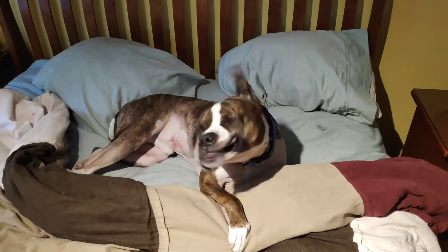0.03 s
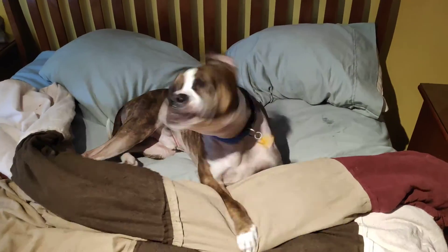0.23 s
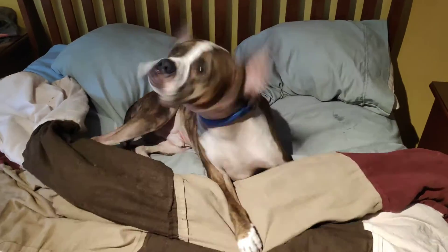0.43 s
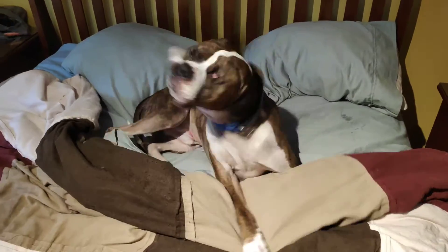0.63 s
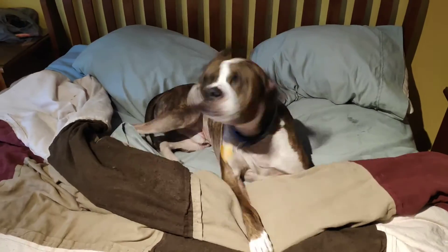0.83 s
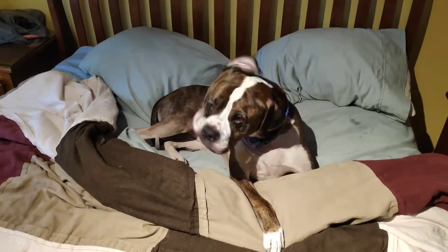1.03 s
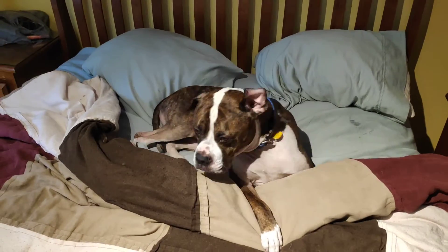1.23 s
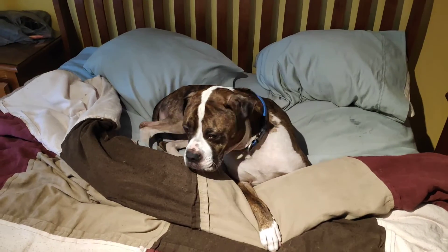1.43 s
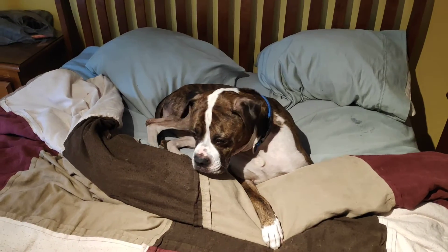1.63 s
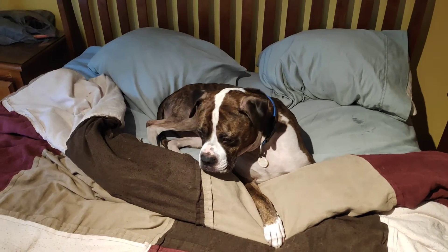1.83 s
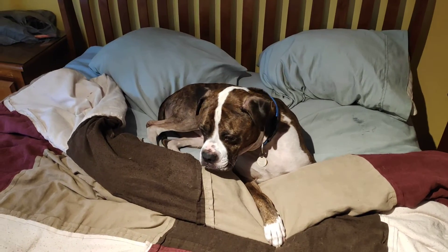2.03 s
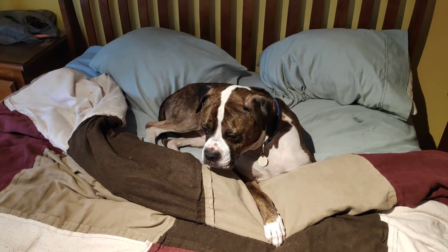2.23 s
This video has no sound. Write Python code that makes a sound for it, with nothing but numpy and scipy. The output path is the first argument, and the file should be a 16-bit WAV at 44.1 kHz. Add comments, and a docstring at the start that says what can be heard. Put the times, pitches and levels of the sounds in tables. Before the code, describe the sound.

A dog shakes its head on a bed in a small room, ears slapping rapidly while its metal tag clashes against the collar buckle. Then it lies down with a soft mattress creak and a faint bedding rustle.

```python
"""A dog shakes its head about six times a second, on a bed in a small, fairly live bedroom.
Its ears slap on every half turn; the steel tag clashes against the collar buckle on every full turn
and jingles on. The mattress rumbles under it. Then it lies down: the mattress creaks, the tag slides
and the bedding shifts. A faint regular ticking sits in the room noise."""
import sys
import numpy as np
from scipy import signal
from scipy.fft import rfft, irfft, next_fast_len
from scipy.io import wavfile
from scipy.ndimage import map_coordinates

SR = 44100
rng = np.random.default_rng(int(sys.argv[2]) if len(sys.argv) > 2 else 0)


def inscribe(sig):
    """Save sig as 16-bit PCM at rate SR to the path in sys.argv[1].

    A 1-D sig is mono; a 2-D sig holds one channel per row.
    Samples are clipped to [-1, 1] before scaling.
    """
    pcm = np.round(np.clip(np.atleast_2d(sig).T, -1, 1) * 32767)
    wavfile.write(sys.argv[1], SR, pcm.astype(np.int16))


N = 101429
HIT_SAMPLES = SR // 2

# room noise, tick spectra (frequency [Hz], level [dB])
HUSH_SPECTRUM = [(12, -31), (20, -5), (33, 0), (70, -3), (103, -12), (174, -9.5), (398, -27.5),
                 (470, -35.5), (889, -21), (1830, -36), (2480, -33), (13800, -37), (15000, -54.5)]
TICK_SPECTRUM = [(200, -16), (650, -9), (1000, -0.5), (1350, -6.5), (1900, -19), (5000, -35)]
# room noise balance (frequency [Hz], left-right [dB])
HUSH_BALANCE = [(30, -5), (100, -11.5), (300, -3), (1000, -13.5), (2500, 3), (8000, -3.5), (14500, 6.5)]
# tick runs (start [s], end [s])
TICK_SPANS = [(1.386, 1.57), (1.684, 1.87), (1.985, 2.17), (2.276, 2.3)]
# reverb decay (frequency [Hz], T60 [s])
TAIL_DECAY = [(150, 0.18), (800, 0.21), (2500, 0.27), (5500, 0.29), (9000, 0.22), (14000, 0.22)]
# reverb colour (frequency [Hz], gain [dB])
TAIL_EQ = [(100, 9), (400, -4.5), (1000, 1), (2500, 6.5), (5500, 3), (9000, -1.5), (14000, -6.5)]
# reverb balance (frequency [Hz], left-right [dB])
TAIL_BALANCE = [(100, -11), (450, -5.5), (750, -12), (1200, 8), (2500, 3), (5000, -2), (9000, 2)]
# early reflections (delay [s], gain [dB])
WALL_ECHOES = [(.0047, -7.5), (0.0113, -18.5)]
# body movement (time [s], mattress [dB], bedding [dB])
BODY_MOTION = [(0, -74, -61.5), (.22, -60, -58.5), (.36, -54.5, -53.5), (.6, -51.5, -47), (.85, -49, -50.5),
               (1.02, -51, -50.5), (1.2, -59.5, -64), (1.42, -65.5, -72), (1.54, -60, -67.5),
               (1.62, -68, -68.5), (1.721, -73.5, -75), (2.3, -69, -75.5)]
# mattress bumps (time [s], level [dB], time constant [s])
MATTRESS_BUMPS = [(0.021, -56, 0.017), (0.402, -49.5, .02), (0.476, -49, 0.02), (0.582, -49.5, 0.046),
                  (0.641, -40, 0.014), (0.761, -46, 0.023), (0.818, -34.5, 0.0076), (1.002, -46, 0.026),
                  (1.137, -52, 0.02), (1.459, -53, 0.019), (1.766, -53, 0.0082), (1.868, -55, 0.0199),
                  (1.953, -60.5, 0.0091), (2.068, -51.5, 0.0066), (2.272, -47, 0.0073)]
# mattress and bedding spectra (frequency [Hz], level [dB])
RUMBLE_SPECTRUM = [(15, 4), (35, 8), (60, -8), (95, -5), (130, -6.5), (190, -11), (290, -22.5),
                   (600, -24.5), (2000, -51.5)]
BUMP_SPECTRUM = [(30, -14), (90, -5), (180, -1.5), (300, -10), (600, -21.5), (2000, -50)]
RUSTLE_SPECTRUM = [(100, 5), (400, 3.5), (850, -3.5), (1500, -7.5), (4000, -7.5), (9000, -10),
                   (15000, -12.5)]
BRUSH_SPECTRUM = [(150, -11), (300, 0.5), (420, 5), (850, -4), (1400, -17), (4000, -29), (12000, -40)]
# split ring on collar loop (time [s], level [dB])
RING_TAPS = [(0.1336, -35.5), (0.1513, -36), (.158, -35), (0.203, -37)]
# steel tag modes (frequency [Hz], bandwidth [Hz], level [dB])
TAG_MODES = [(3570, 670, -4), (6620, 260, 3.5), (9070, 150, 1.5), (9790, 350, -3), (10730, 130, 11.5),
             (12760, 170, 2.5), (13500, 300, -6)]
# tag ringing free (time [s], level [dB])
TAG_PINGS = [(.189, -32.5), (.198, -28), (1.425, -55), (1.462, -50)]
# tag sliding on its ring (time [s], relative level [dB], rise [s], fall [s])
TAG_SLIDES = [(0.158, -31.5, 0.0022, 0.035), (.2, -37, 0.0077, 0.083), (1.466, -45, .03, 0.04),
              (1.673, -60, 0.013, 0.033)]
# tag on buckle, levels relative (time [s], level [dB], left-right [dB], 30 dB decay [s],
# lead-in [s], clack [dB], room [dB], jingle [dB])
TAG_CLASHES = [(0.0869, -37.5, 21, 0.0018, 0.00069, 2, -2.5, -9),
               (0.112, -41.5, 7, 0.004, 0.00064, -1, 0, 6.5),
               (.152, -31, 11.5, 0.0055, .002, -11, -9, -1.5),
               (0.2928, -21.5, 22.5, 0.0052, 0.0004, -25.5, -4, 7.5),
               (0.2953, -27.5, 24, 0.0032, 0.00035, -28, -9, 0),
               (.364, -7.5, 2, 0.0036, 0.0024, -3, 1.5, -2),
               (.5052, -12, 11.5, 0.0041, 0.00044, -2.5, -5, -12),
               (0.5074, -6, 2.5, 0.009, .0005, -4, -4.5, -8.5),
               (0.5118, -12.5, 5.5, 0.006, 0.0011, 5.5, -2.5, -1),
               (.682, -15, 2.5, 0.0061, 0.0046, -5.5, 2.5, 5.5),
               (0.6868, -4, 2, 0.0021, 0.00035, -11, 2, -7),
               (0.8643, -7, 2, 0.0051, 0.0063, -13, -2.5, -5.5),
               (0.8694, -13.5, 4, 0.0028, .001, 8, 2.5, -4.5),
               (.918, -19.5, 13.5, 0.016, 0.0098, -7, -4.5, -4.5),
               (1.006, -25.5, 13.5, 0.032, 0.0026, 6, -9.5, -7),
               (1.0367, -12, 8, 0.017, 0.0086, -0.5, 0, -21),
               (1.3336, -34, 14.5, 0.0069, 0.0037, 8, -7.5, -2.5),
               (1.3414, -28, 6.5, 0.0037, 0.00063, 3, -7, 0.5)]
# tag spectra (frequency [Hz], level [dB])
JINGLE_SPECTRUM = [(2000, -33), (5000, -19.5), (6800, 1.5), (8000, -7), (9500, -3.5), (11000, -2.5),
                   (13000, 0.5), (14500, -5.5)]
CLASH_SPECTRUM = [(800, -61), (2500, -28.5), (5000, -1.5), (7500, -3), (10000, 1.5), (12500, 0),
                  (15000, -2.5)]
CLACK_SPECTRUM = [(700, -53), (1800, -18), (2800, -9), (4200, 1), (6000, -3.5), (8000, -8.5),
                  (14000, -37.5)]
# ear slaps, and a quick wall echo of the slap at 0.568 s; levels relative
# (time [s], level [dB], left-right [dB], crack [dB], room [dB], pop [Hz])
SLAPS_AND_ECHO = [(0.2374, -24, 4.5, -3, -0.5, 739), (0.3126, -40, 2.5, 6, 10.5, 696),
                  (0.3979, -36, 5, 8, 7, 860), (0.4809, -39.5, -3.5, 9, 5, 760),
                  (.485, -36.5, 9.5, 10.5, 2, 730), (0.568, -24, 2.5, 2, 2, 1050),
                  (0.5724, -35, 7, 6.5, -4.5, 1010), (0.6521, -29, 3.5, 2.5, -0.5, 880),
                  (0.742, -26, 0.5, 4.5, 2.5, 930), (0.8262, -36, 5, 8, 2.5, 790),
                  (0.918, -25, -2, 0.5, -2.5, 814), (1.0027, -28, 3, 5, 0.5, 824),
                  (1.117, -46, 1, -2, 2, 784)]
# ear spectra (frequency [Hz], level [dB])
POP_SPECTRUM = [(80, -23.5), (280, -14.5), (480, -5.5), (700, -3.5), (900, 1.5), (1150, -3), (1500, -13.5),
                (2500, -14), (6000, -26.5)]
CRACK_SPECTRUM = [(500, -13.5), (1500, -8.5), (2500, -2.5), (3900, 1.5), (6000, -6), (10000, -7.5),
                  (15000, -7.5)]
# right-channel treble shading (frequency [Hz], gain [dB])
CLASH_RIGHT_EQ = [(2000, 7.5), (4000, -2), (7000, -2.5), (10000, -3.5), (14000, -19.5)]
EAR_RIGHT_EQ = [(700, -1.5), (2500, 0.5), (7000, -6.5), (14000, -22.5)]


def amp(db):
    return 10 ** (np.asarray(db) / 20)


def unit_rms(x):
    return x / np.sqrt(np.mean(x ** 2) + 1e-20)


def decay(t, t60_s):
    return amp(-60 * t / t60_s)


def along(points, hz):
    """Interpolate on a log frequency axis."""
    knots_hz, values = np.transpose(points)
    return np.interp(np.log(hz + 1), np.log(knots_hz + 1), values)


def pan(db):
    """Stereo gains for a left-right difference."""
    gains = np.array([amp(db / 2), amp(-db / 2)]).reshape(2, -1)
    return gains / np.sqrt(np.mean(gains ** 2, axis=0))


def filtered(x, response):
    """Apply the gain response(hz)."""
    n = x.shape[-1]
    size = next_fast_len(n + SR // 4)
    return irfft(rfft(x, size) * response(np.fft.rfftfreq(size, 1 / SR)), size)[..., :n]


def coloured(x, spectrum):
    """Minimum-phase filter of unit energy."""
    size = 2048
    cepstrum = irfft(np.log(amp(along(spectrum, np.fft.rfftfreq(size, 1 / SR)))))
    cepstrum[1:size // 2] *= 2
    cepstrum[size // 2 + 1:] = 0
    kernel = irfft(np.exp(rfft(cepstrum)))
    return signal.fftconvolve(x, kernel[None] / np.linalg.norm(kernel), axes=1)[:, :x.shape[1]]


def wobble(rate_hz, n=N):
    """Smooth random curve."""
    knots = rng.standard_normal(int(n * rate_hz / SR) + 4)
    return map_coordinates(knots, [np.arange(n) * rate_hz / SR])


def add(out, at_s, x):
    start = max(0, round(at_s * SR))
    out[:, start:start + x.shape[1]] += x[:, :out.shape[1] - start]


def click(spectrum):
    return coloured(signal.unit_impulse(HIT_SAMPLES)[None], spectrum)


def stereo_noise(spectrum, spread):
    return unit_rms(coloured(rng.standard_normal(N) + spread * rng.standard_normal((2, N)), spectrum))


def burst(envelope, spectrum, coherence):
    """Stereo noise burst with the energy of its envelope."""
    common = np.sqrt(coherence) * rng.standard_normal(HIT_SAMPLES)
    separate = np.sqrt(1 - coherence) * rng.standard_normal((2, HIT_SAMPLES))
    x = coloured((common + separate) * envelope, spectrum)
    return x * np.linalg.norm(envelope) / np.linalg.norm(x, axis=1, keepdims=True)


def bedroom(x, wet_db):
    """Direct hit, two wall reflections and a diffuse tail."""
    build_s = 0.007
    hz, t, bands = signal.stft(rng.standard_normal((2, HIT_SAMPLES)), SR, nperseg=256)
    bands = bands * decay(t, along(TAIL_DECAY, hz)[:, None])
    tail = signal.istft(bands, SR, nperseg=256)[1][:, :HIT_SAMPLES]
    tail *= 1 - np.exp(-np.arange(HIT_SAMPLES) / SR / build_s)
    tail /= np.linalg.norm(tail[0])
    tail = filtered(tail, lambda f: amp(along(TAIL_EQ, f) + np.outer([.5, -.5], along(TAIL_BALANCE, f))))
    for delay_s, db in WALL_ECHOES:
        lags = (SR * delay_s * rng.uniform(0.92, 1.08, 2)).astype(int)
        tail[[0, 1], lags] += amp(db)
    return x + amp(wet_db) * signal.fftconvolve(x, tail, axes=1)[:, :HIT_SAMPLES]


def background():
    """Quiet room noise and short runs of faint, even ticks."""
    tick_gap_s = 0.03
    hush = stereo_noise(HUSH_SPECTRUM, spread=0.95)
    out = amp(-64) * filtered(hush, lambda hz: pan(along(HUSH_BALANCE, hz)))
    tick = amp(-42.5) * pan(-36) * click(TICK_SPECTRUM)
    for start_s, end_s in TICK_SPANS:
        for at_s in np.arange(start_s, end_s, tick_gap_s):
            add(out, at_s, tick)
    return out


def bed():
    """Movement shakes the mattress, pushes air and rustles bedding; one brush as the dog settles."""
    swing_hz, brush_s, brush_width_s = 10, 1.555, 0.08
    t = np.arange(N) / SR
    times_s, *levels_db = np.transpose(BODY_MOTION)
    mattress, bedding = [amp(np.interp(t, times_s, db)) for db in levels_db]
    rumble = mattress * amp(3 * wobble(25)) * stereo_noise(RUMBLE_SPECTRUM, spread=1) * pan(-8.5)
    air = mattress * amp(9) * np.sin(2 * np.pi * swing_hz * t + 0.5 * wobble(6.5))
    rustle = bedding * amp(1.54 * wobble(70)) * stereo_noise(RUSTLE_SPECTRUM, spread=1)
    swell = np.exp(-((t - brush_s) / brush_width_s) ** 2 / 2)
    brush = amp(-67 + 2.5 * wobble(39)) * swell * stereo_noise(BRUSH_SPECTRUM, spread=0.71)
    return rumble + air + rustle + brush


def mattress_bumps():
    """Dull thuds as weight shifts."""
    out, t = np.zeros((2, N)), np.arange(HIT_SAMPLES) / SR
    for at_s, db, tau_s in MATTRESS_BUMPS:
        add(out, at_s, amp(db) * pan(-18) * burst(np.exp(-t / tau_s), BUMP_SPECTRUM, coherence=0.82))
    return out


def mattress_creak():
    """The mattress gives way in soft, uneven slips as the dog lies down."""
    start_s, end_s, gap_s, scatter_s = 1.24, 1.395, 0.013, 0.003
    centre_hz, attack_s = 175, 0.003
    out, t = np.zeros((2, N)), np.arange(HIT_SAMPLES) / SR
    envelope = decay(t, t60_s=0.04) * (1 - np.exp(-t / attack_s))
    for at_s in np.arange(start_s, end_s, gap_s):
        timing, pitch, size = rng.standard_normal(3)
        slip = np.sin(2 * np.pi * centre_hz * np.exp(0.2 * pitch) * t) * envelope
        add(out, at_s + scatter_s * timing, amp(-46 + 1.8 * size) * pan(-21) * slip)
    return out


def ring_taps():
    """The split ring taps the collar loop: one short note each."""
    out, t = np.zeros((2, N)), np.arange(HIT_SAMPLES) / SR
    for at_s, db in RING_TAPS:
        hz = 3710 * (1 + 0.016 * rng.standard_normal())
        note = np.sin(2 * np.pi * hz * t) * decay(t, t60_s=0.0099)
        add(out, at_s, bedroom(amp(db) * pan(16) * note, wet_db=-13))
    return out


def tag_pings():
    """Light touches ring the tag; its narrowest modes last longest."""
    out, t = np.zeros((2, N)), np.arange(HIT_SAMPLES) / SR
    hz, width_hz, mode_db = np.transpose(TAG_MODES)[:, :, None]
    attack_s, t60_s = 0.0018, 0.11 * width_hz.min() / width_hz
    for at_s, db in TAG_PINGS:
        gains = amp(mode_db + 2 * rng.standard_normal(mode_db.shape) - mode_db.max())
        phase = 2 * np.pi * (hz * t + rng.random(hz.shape))
        phase += 0.5 * np.array([wobble(120, HIT_SAMPLES) for _ in TAG_MODES])
        ring = np.sum(gains * np.sin(phase) * decay(t, t60_s), axis=0)
        add(out, at_s, amp(db) * pan(22.5) * ring * (1 - np.exp(-t / attack_s)))
    return out


def tag_response(hz):
    """Steel tag resonances, alternating in sign."""
    return sum((-1) ** k * amp(db) * 1j * hz * width_hz / (mode_hz ** 2 - hz ** 2 + 1j * hz * width_hz)
               for k, (mode_hz, width_hz, db) in enumerate(TAG_MODES))


def fine_contacts():
    """Metal chatter: noise with a fast-flickering level."""
    return rng.standard_normal((2, N)) * amp(3 * wobble(700))


def tag_jingle_and_slide():
    """Fine contacts jingle after each clash; sliding excites the tag's modes over a bright fizz."""
    t = np.arange(N) / SR
    jingle_power, slide_power = np.zeros((2, N))
    for at_s, db, *_, jingle_db in TAG_CLASHES:
        jingle_power += (t > at_s) * (amp(db + jingle_db - 21) * decay(np.abs(t - at_s), t60_s=0.5)) ** 2
    for at_s, db, rise_s, fall_s in TAG_SLIDES:
        envelope = np.exp(-np.where(t < at_s, ((t - at_s) / rise_s) ** 2 / 2, (t - at_s) / fall_s))
        slide_power += (amp(db - 5.5) * envelope) ** 2
    jingle = unit_rms(coloured(fine_contacts(), JINGLE_SPECTRUM))
    ring = unit_rms(filtered(fine_contacts(), tag_response))
    fizz = 0.6 * unit_rms(coloured(fine_contacts(), JINGLE_SPECTRUM))
    return pan(22.5) * (np.sqrt(jingle_power) * jingle + np.sqrt(slide_power) * (ring + fizz))


def tag_clashes():
    """Tag and buckle chatter as they meet, clash and rattle to rest."""
    lead_db, grain_db = -13, 0.5
    out, t = np.zeros((2, N)), np.arange(HIT_SAMPLES) / SR
    for at_s, db, pan_db, fall_s, lead_s, clack_db, wet_db, _ in TAG_CLASHES:
        envelope = np.where(t < lead_s, amp(lead_db), decay(np.abs(t - lead_s), t60_s=2 * fall_s))
        contacts = envelope * amp(grain_db * wobble(1233, HIT_SAMPLES))
        contacts *= np.linalg.norm(envelope) / np.linalg.norm(contacts)
        bright = burst(contacts, CLASH_SPECTRUM, coherence=0.239)
        clack = amp(clack_db - 8) * burst(contacts, CLACK_SPECTRUM, coherence=0.45)
        add(out, at_s - lead_s, amp(db - 1.5) * pan(pan_db) * bedroom(bright + clack, wet_db))
    return filtered(out, lambda hz: amp(np.outer([0, 1], along(CLASH_RIGHT_EQ, hz))))


def ear_slaps_and_echo():
    """Ears hit the head: hollow pop of trapped air, sharp crack. One row is a slap's wall echo."""
    spectrum_peak_hz = 900
    out, t = np.zeros((2, N)), np.arange(HIT_SAMPLES) / SR
    landing = decay(t, t60_s=0.0066)
    for at_s, db, pan_db, crack_db, wet_db, pop_hz in SLAPS_AND_ECHO:
        hollow = np.array(POP_SPECTRUM) * [pop_hz / spectrum_peak_hz, 1]
        tip = np.linalg.norm(landing) * click(hollow)
        fold = amp(-5.5) * burst(landing, hollow, coherence=0.64)  # rest of the ear, a noisy decay starting with the tip
        crack = burst(decay(t, t60_s=0.007), CRACK_SPECTRUM, coherence=0.28)
        pop = bedroom(pan(pan_db) * (tip + fold), wet_db)
        crack = bedroom(pan(pan_db + 4) * crack, wet_db - 5)  # directional: less reaches the walls
        add(out, at_s, amp(db + 3) * (pop + amp(crack_db + 2.5) * crack))
    return filtered(out, lambda hz: amp(np.outer([0, 1], along(EAR_RIGHT_EQ, hz))))


def scene():
    dog = ear_slaps_and_echo() + tag_clashes() + tag_jingle_and_slide() + tag_pings() + ring_taps()
    return dog + bed() + mattress_bumps() + mattress_creak() + background()


def record(dry):
    """Steep low-pass."""
    cutoff_hz = 14450
    return filtered(dry, lambda hz: 1 / (1 + (hz / cutoff_hz) ** 140))


dry = scene()
out = record(dry)
inscribe(out)
```